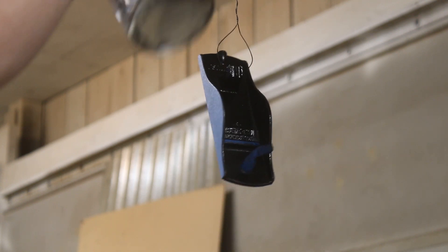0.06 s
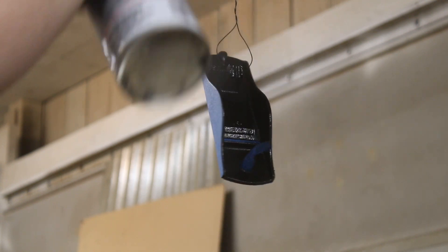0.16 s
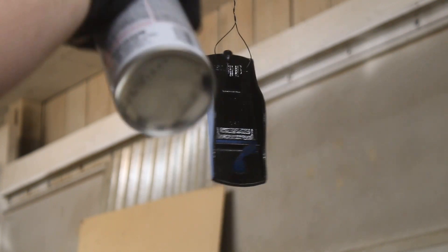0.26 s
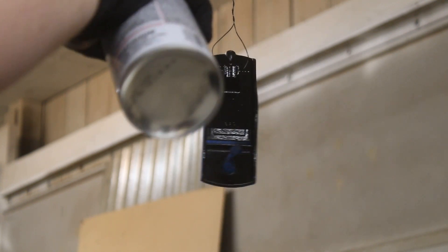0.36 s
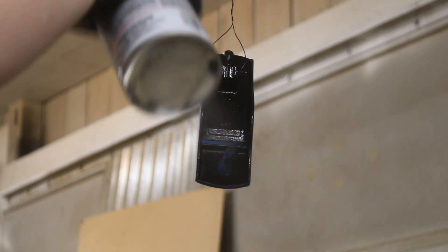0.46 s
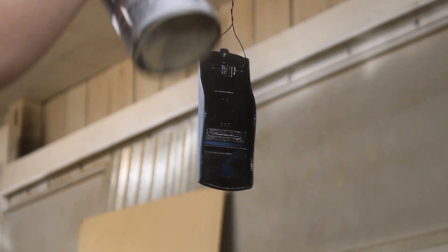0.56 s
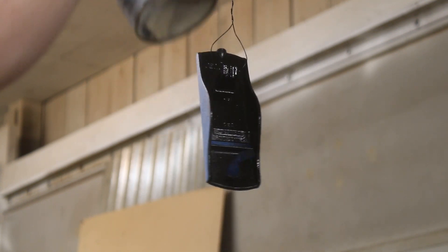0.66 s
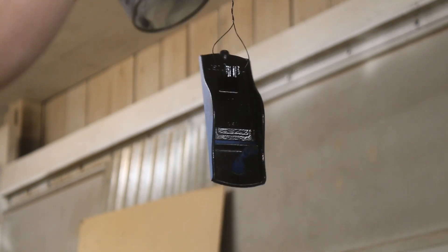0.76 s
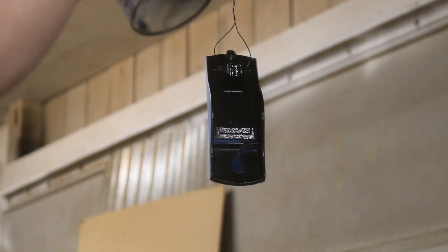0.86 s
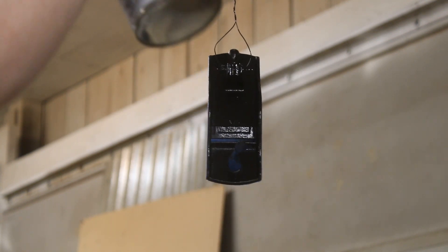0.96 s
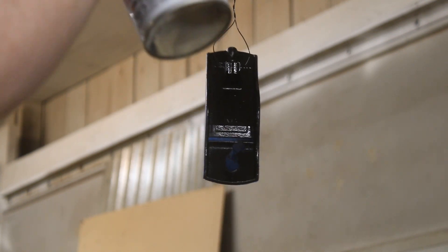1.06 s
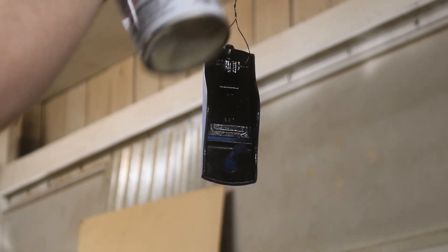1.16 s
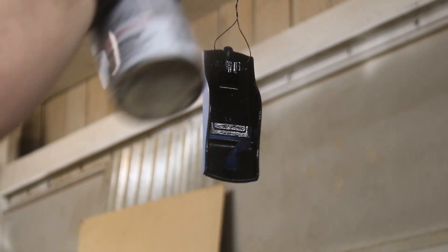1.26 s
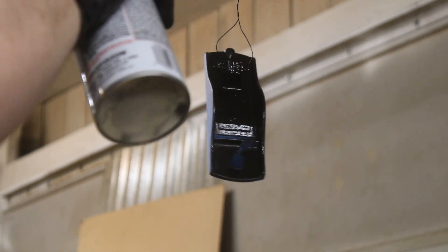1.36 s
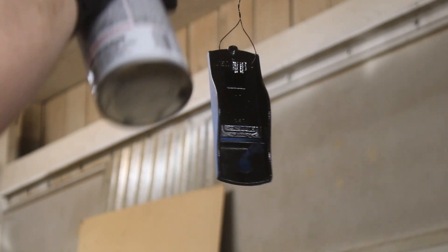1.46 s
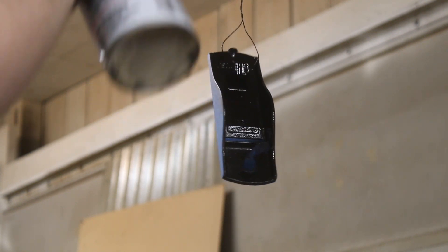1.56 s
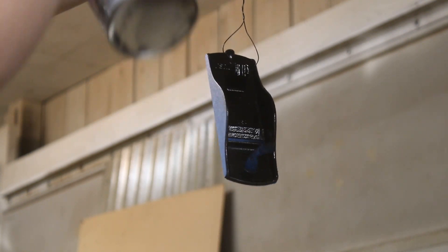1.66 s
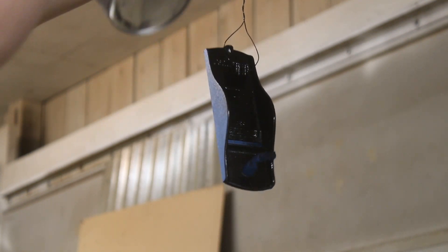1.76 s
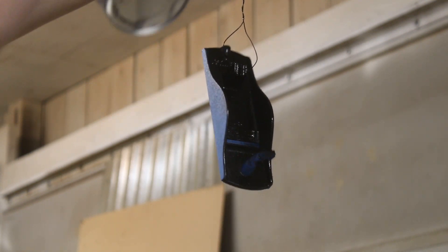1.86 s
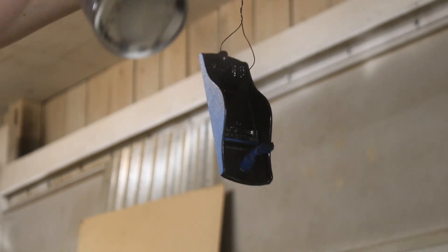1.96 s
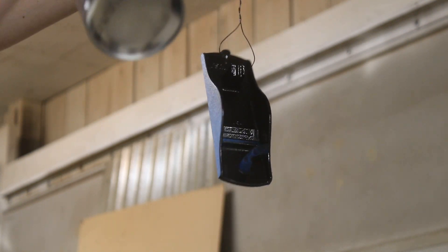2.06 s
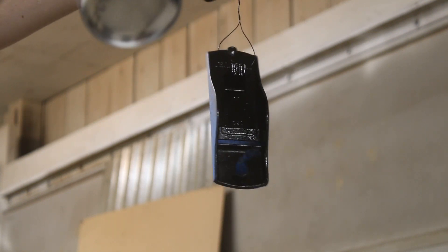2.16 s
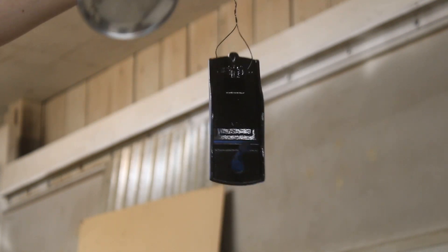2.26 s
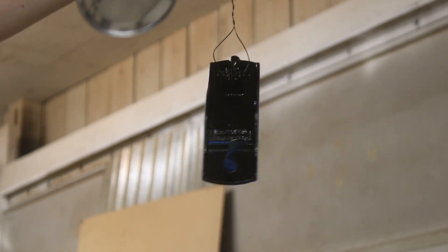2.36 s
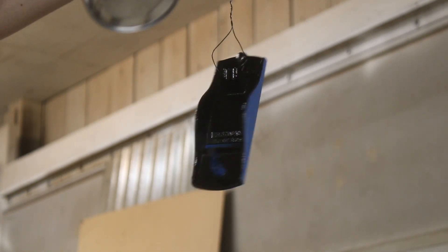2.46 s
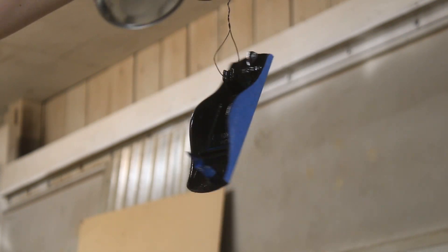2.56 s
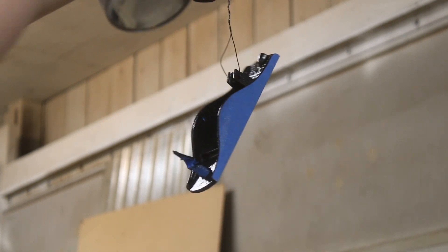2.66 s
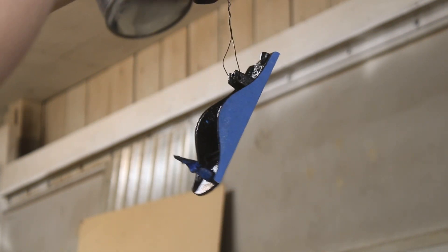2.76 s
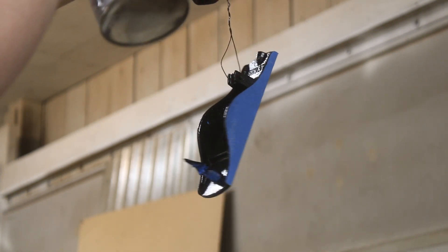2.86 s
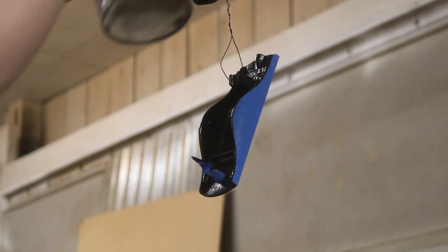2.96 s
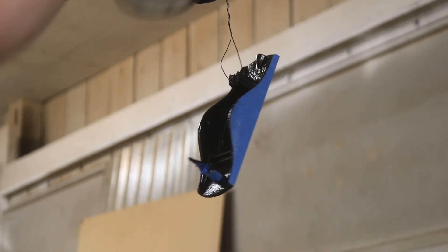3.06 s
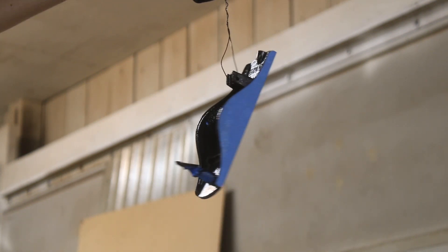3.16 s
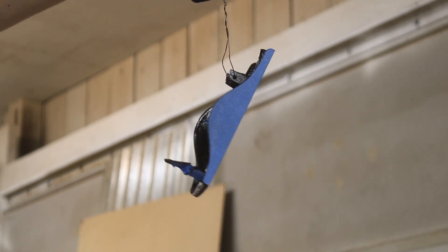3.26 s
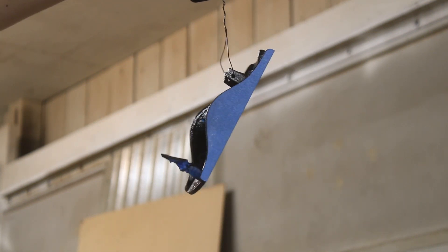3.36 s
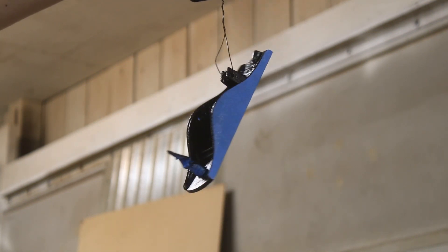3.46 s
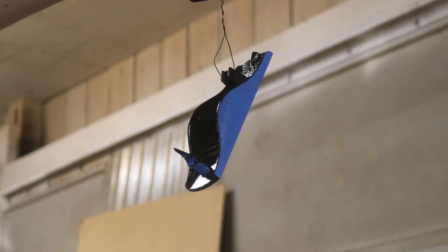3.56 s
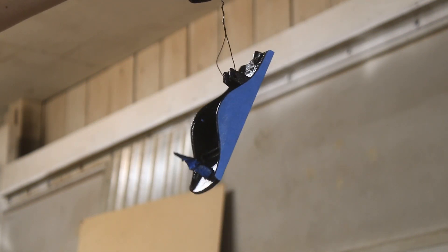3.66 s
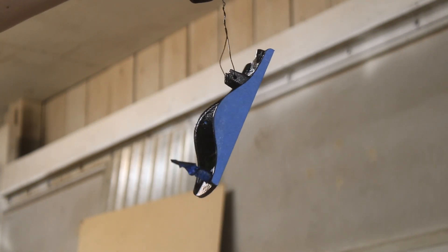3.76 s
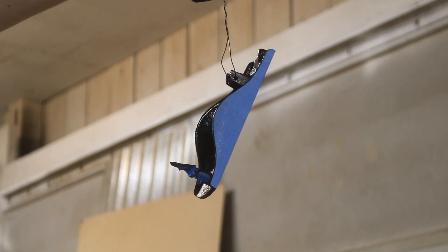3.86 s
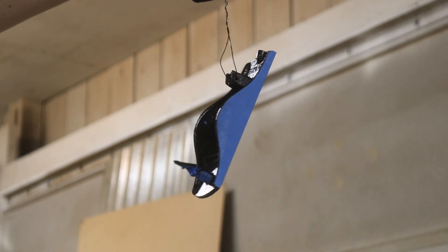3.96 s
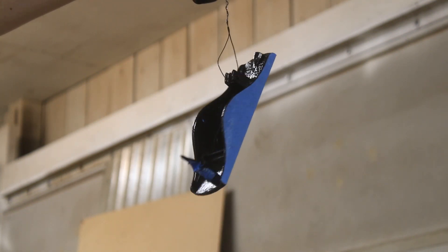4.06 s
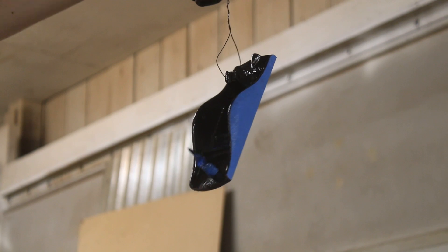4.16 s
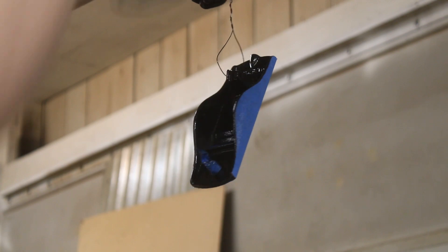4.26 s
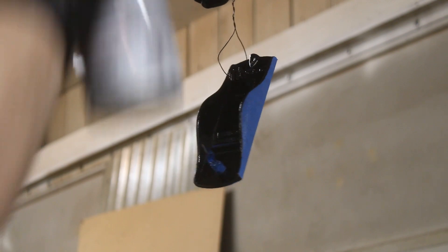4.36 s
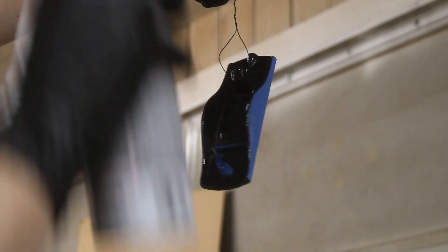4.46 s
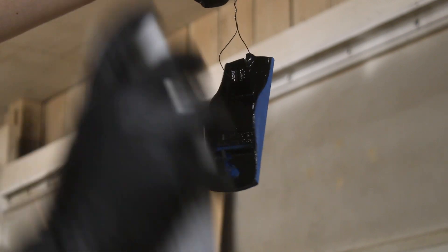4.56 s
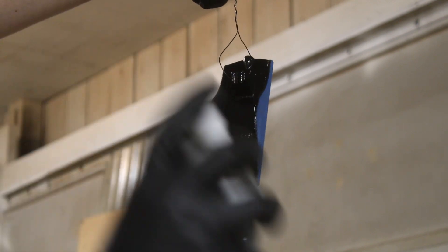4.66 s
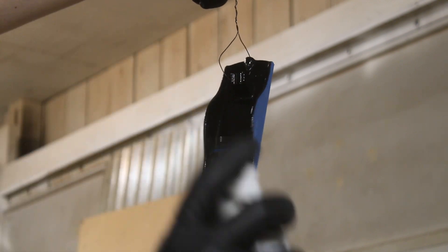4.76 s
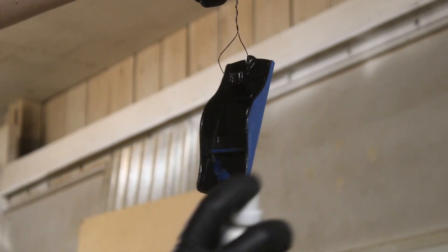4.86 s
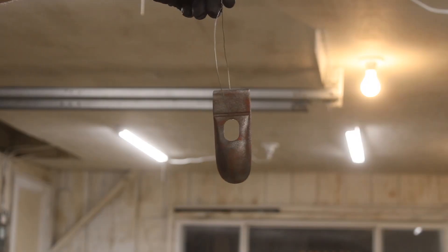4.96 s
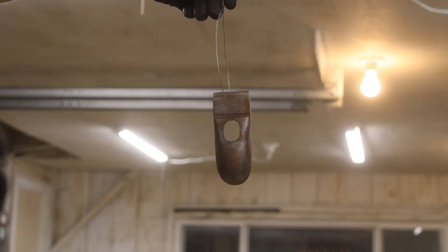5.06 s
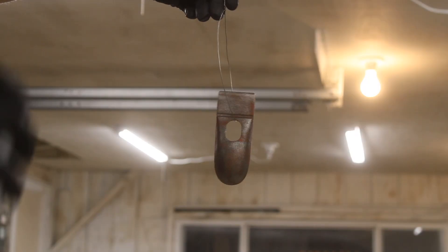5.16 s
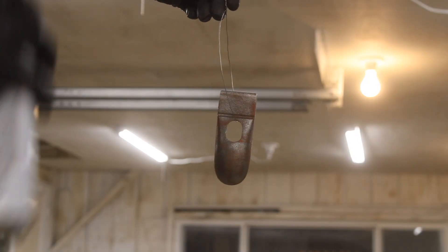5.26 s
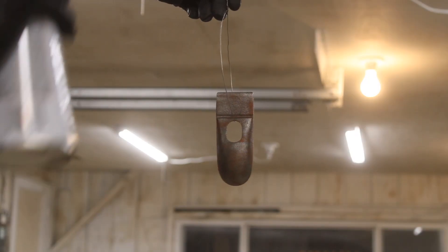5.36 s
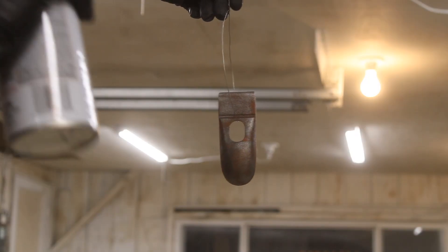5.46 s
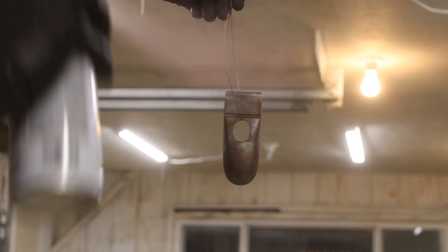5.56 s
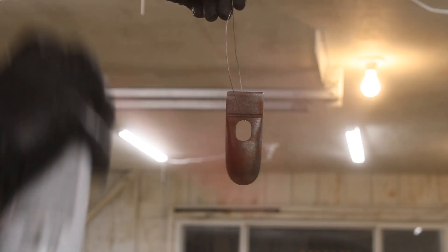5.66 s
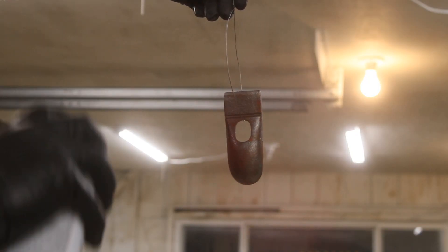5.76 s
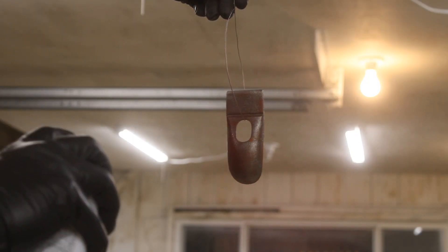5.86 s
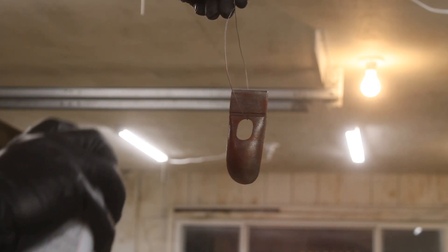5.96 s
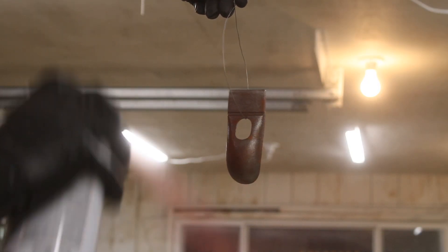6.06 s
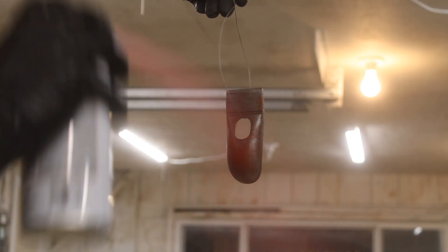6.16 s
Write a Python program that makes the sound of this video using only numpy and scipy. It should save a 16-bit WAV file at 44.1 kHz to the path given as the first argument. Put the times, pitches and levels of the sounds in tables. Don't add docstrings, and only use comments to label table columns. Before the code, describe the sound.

In a wooden workshop, a close spray can gives short bright hisses, each opening with a plastic click and a surge before cutting off into a diffuse room tail. Between them the mixing ball tinks faintly and gloves and sleeve rustle. After a fifth burst comes soft handling, then a change of corner with mains hum and two bursts from a second can. A far machine drones low.

```python
import sys
import numpy as np
from scipy import signal
from scipy.fft import rfft, irfft, next_fast_len
from scipy.io import wavfile

SR = 44100
rng = np.random.default_rng(int(sys.argv[2]) if len(sys.argv) > 2 else 0)


def to_wav(sig):
    pcm = np.clip(np.atleast_2d(sig), -1, 1) * 32767
    pcm = np.round(pcm).astype(np.int16)
    wavfile.write(sys.argv[1], SR, pcm.T)


def makeup_ratio(level_db):
    decades = np.asarray(level_db, float) / 20
    return 10 ** decades


N = 274302
CHANGE_S = 5
BURST = int(0.4 * SR)

# time_s, level_db
MACHINE_SWELL = [(0, -2.5), (1.2, 1.5), (2.4, 1.5), (3.2, -2.5), (4.9, -11), (6.22, -10)]


def rms_one(x):
    return x / np.sqrt(np.mean(x ** 2) + 1e-20)


def at_hz(points, hz):
    points_hz, values = np.transpose(points)
    return np.interp(np.log(hz), np.log(points_hz), values)


def in_time(rows):
    s, *columns = np.transpose(rows)
    return np.array([np.interp(np.arange(N) / SR, s, c) for c in columns])


def drift(rate_hz):
    r = np.exp(-2 * np.pi * rate_hz / SR)
    wander = signal.lfilter([1], [1, -2 * r, r * r], rng.standard_normal(N + SR))
    return rms_one(wander[SR:])


def coloured(spectrum):
    size = next_fast_len(N)
    hz = np.maximum(np.arange(size // 2 + 1) * SR / size, 10)
    shape = makeup_ratio(at_hz(spectrum, hz)) * (hz > 18)
    return rms_one(irfft(rfft(rng.standard_normal(size)) * shape, size)[:N])


def band(x, low_hz, high_hz):
    sos = signal.butter(2, [low_hz, min(high_hz, 0.45 * SR)], "band", fs=SR, output="sos")
    return signal.sosfilt(sos, x)


def resonate(x, hz, width_hz):
    r = np.exp(-np.pi * width_hz / SR)
    poles = [1, -2 * r * np.cos(2 * np.pi * hz / SR), r * r]
    return signal.lfilter([(1 - r * r) / 2, 0, (r * r - 1) / 2], poles, x)


def strike(out, s, burst):
    i = round(s * SR)
    return out + np.pad(burst[:N - i], (i, max(N - i - len(burst), 0)))


def dying(t60_s, count=BURST):
    return makeup_ratio(-60 * np.arange(count) / (SR * t60_s))


def flow(press, surge):
    # core_db, middle_db, can_body_db, top_edge_db
    band_levels = [
        (0, -6.5, -9.5, -15.5),
        (0, -5, -6.5, -14.5),
    ]
    aim_lift, leak_lift, sigh_lift = (-3, 8.5, 6, 6), (-4, 2.5, 10, -5), (-1, 1, 3.5, 1)
    crack_db, open_s, open_db, shut_s = -20.5, 0.011, -3.5, 0.024
    leak_s, sigh_s = 0.01, 0.0071

    start_s, held_s, flow_db, aim = press
    peak_s, surge_db, settle_s = surge
    t = np.arange(N) / SR - start_s
    top_db = flow_db + surge_db
    jet_db = np.interp(t, [0, min(open_s, 0.9 * peak_s), peak_s, peak_s + settle_s],
                       [top_db + crack_db, top_db + open_db, top_db, flow_db])
    leak = np.exp(-np.abs(t) / leak_s)
    sigh = np.exp(-np.maximum(held_s - t, 0) / sigh_s)
    opened = np.clip(t / 0.00071, 0, 1) * np.clip((held_s + shut_s - t) / shut_s, 0, 1)
    levels = band_levels[int(start_s > CHANGE_S)]
    lift_db = [b + aim * a + leak * k + sigh * g
               for b, a, k, g in zip(levels, aim_lift, leak_lift, sigh_lift)]
    return opened * makeup_ratio(jet_db + np.array(lift_db))


def spray():
    # start_s, held_s, steady_flow_db, aim (-1 toward the ear to 1 away)
    presses = [
        (0.069, 0.17, -40.5, 0.027),
        (0.416, .2, -40, -0.11),
        (1.208, 0.12, -41, -0.048),
        (1.902, 0.11, -42.5, 0.073),
        (3.45, .13, -43, 0.019),
        (5.521, .2, -43, 0.22),
        (6.052, .3, -40.5, 0.045),
    ]
    # peak_after_s, over_steady_flow_db, settle_s
    surges = [
        (0.019, 8.5, 0.025),
        (0.013, 7.5, 0.036),
        (0.028, 8, 0.029),
        (0.032, 9, 0.051),
        (.012, 8, .11),
        (0.093, 10, 0.096),
        (0.03, 6.5, 0.03),
    ]
    # freq_hz, density_db
    first_jet, second_jet = [(240, -31), (400, -11), (653, -16), (900, -10), (1120, -15), (2290, -2.5),
                             (3110, -4.5), (7100, 2), (13100, -20), (15500, -40)], [(240, -31), (400, -14), (1030, -20.5), (1400, -10.5),
                                          (2120, -9.5), (2320, -3), (2560, -3), (2800, -2.5), (3010, -10),
                                          (5300, -3.5), (7670, 2.5), (11400, -14), (14000, -25),
                                          (15500, -43)]
    # freq_hz, width_hz, level_db
    whistles = [(2240, 74, -32), (5620, 100, -20), (6800, 510, -9), (7350, 180, -10), (7830, 600, -11)]

    t = np.arange(N) / SR
    gains = sum(flow(press, surge) for press, surge in zip(presses, surges))
    white = rng.standard_normal(N)
    whistle = sum(makeup_ratio(db) * rms_one(resonate(white, hz, width)) * makeup_ratio(2.0 * drift(13))
                  for hz, width, db in whistles)
    noise = np.where(t < CHANGE_S, coloured(first_jet), coloured(second_jet)) + whistle
    other = np.where(t < CHANGE_S, coloured(first_jet), coloured(second_jet)) + whistle[::-1]
    core, middle = band(noise, 5770, 10950), band(other, 3400, 6360)
    can_body, top_edge = band(noise, 310, 3490), band(other, 10200, 15800)
    jet = sum(gain * rms_one(part) * makeup_ratio(1.2 * drift(40))
              for gain, part in zip(gains, [core, middle, can_body, top_edge]))
    sputter = makeup_ratio(0.4 * drift(280) + 0.28 * drift(30))
    return jet * sputter


def valve():
    # time_s, peak_db, pitch_hz, t60_s, crack_db
    clicks = [
        (0.0726, -37, 2320, 0.06, -3),
        (0.4183, -40, 2740, 0.072, -9),
        (1.2123, -25.5, 2706, 0.047, -20),
        (1.2274, -32, 2290, 0.081, -8),
        (1.9134, -34, 2330, 0.12, -4),
        (3.451, -27, 2720, 0.075, -16),
        (5.5141, -27, 2880, 0.033, -2),
        (5.7172, -30.5, 2860, 0.052, 9),
        (6.0567, -28, 2675, 0.093, -21),
    ]
    out, t = np.zeros(N), np.arange(BURST) / SR
    for s, db, hz, t60, crack_db in clicks:
        crack = band(rng.standard_normal(BURST) * dying(0.0091), 1200, 7400)
        ping = np.sin(2 * np.pi * hz * t)
        ping = ping + 0.26 * np.sin(2 * np.pi * 1.17 * hz * t) + 0.08 * np.sin(2 * np.pi * 0.5 * hz * t)
        ping = ping * dying(min(t60, 0.06)) * (1 - dying(0.003))
        out = strike(out, s, makeup_ratio(db - 6.5) * (ping + makeup_ratio(crack_db) * crack))
    return out


def ball():
    # time_s, peak_db, brightness_db
    touches = [(0.0044, -76, -4), (0.3726, -51.5, 4), (0.9198, -62, 2), (0.966, -57.5, 7),
               (2.6748, -54.5, 2), (2.7094, -65, 0), (3.2535, -56, 9), (3.3064, -63, -2), (3.3494, -69, 0),
               (3.8492, -56.5, 9), (3.898, -65, 1), (3.9789, -73, 0)]
    # freq_hz, level_db, t60_s
    wall = [(3350, -7, .1), (3460, -5, .1), (3570, -2, .2), (3640, -3, .26), (5020, -14, .08),
            (5500, -10, .1), (6120, -15, .07), (6480, -10, .1), (7150, -15, .07), (8750, -14, .11)]
    out, t = np.zeros(N), np.arange(BURST) / SR
    spread = rng.normal(0, 1.9, (len(touches), len(wall)))
    for (s, db, bright_db), own in zip(touches, spread):
        ring = sum(makeup_ratio(level + d + bright_db * (hz > 4000)) * np.sin(2 * np.pi * hz * t + d) * dying(t60)
                   for (hz, level, t60), d in zip(wall, own))
        slosh = rms_one(band(rng.standard_normal(BURST), 3200, 7500)) * dying(0.17)
        out = strike(out, s, makeup_ratio(db - 2.0) * (ring + makeup_ratio(-5) * slosh) * (1 - dying(0.0047)))
    return out


def ticks():
    # time_s, peak_db, centre_hz, width_octaves, t60_s
    touches = [(.48, -52, 385, 0.74, 0.72), (2.2, -52.5, 2500, 1.3, 0.19), (2.205, -56.5, 1357, 0.2, 0.36),
               (2.581, -55.5, 6500, 1.1, .03), (4.093, -57, 6800, 0.65, 0.059),
               (4.168, -42, 2190, 1.5, 0.019), (4.168, -38, 4340, 0.53, 0.022),
               (4.167, -42, 7050, 0.51, 0.022), (4.195, -59, 4100, .5, .12),
               (4.521, -44.5, 9100, 0.88, 0.0072), (4.57, -52, 4000, 2.2, .015),
               (4.654, -51, 4400, .4, 0.04), (4.654, -53.5, 7750, 0.36, 0.06),
               (4.656, -52, 1500, 0.3, 0.068), (4.569, -51, 1450, 0.34, .03),
               (4.679, -57, 3020, 0.17, 0.056), (4.679, -50, 1710, .8, .03),
               (5.514, -42.5, 1460, .4, 0.023), (5.503, -61, 7000, .8, 0.028), (4.67, -59, 4380, .15, .2),
               (4.7, -54, 6440, 0.16, 0.058), (4.72, -60, 7850, 0.14, 0.27),
               (4.785, -59, 3030, 0.16, 0.084), (4.812, -45.5, 3300, 1.5, 0.027)]
    out, white = np.zeros(N), rng.standard_normal((len(touches), BURST))
    for (s, db, hz, octaves, t60), w in zip(touches, white):
        edges = hz * 2 ** (-octaves / 2), hz * 2 ** (octaves / 2)
        grain = rms_one(band(band(w, *edges), *edges))[::-1]
        out = strike(out, s, makeup_ratio(db - 1.0) * grain * dying(t60) * (1 - dying(0.14 * t60)))
    return out


def rustle():
    # start_s, loudest_s, end_s, level_db
    rubs = [
        (1.746, 1.897, 1.93, -66),
        (3.098, 3.293, 4.8, -66.5),
        (4.285, 4.695, 4.98, -60),
        (5.2, 5.45, 4.9, -78),
    ]
    edge_db = -17
    t = np.arange(N) / SR
    gain = 0
    for start, top, end, db in rubs:
        swell_db = np.interp(t, [start, top, end], [db + edge_db, db, db + edge_db])
        gain = gain + makeup_ratio(swell_db) * (t > start) * (t < end)
    grains = rng.standard_normal(N) * makeup_ratio(2.0 * drift(300))
    cloth = band(grains, 2500, 6800) + 0.46 * resonate(grains, 4500, 400) + 0.5 * resonate(grains, 7100, 300)
    return gain * rms_one(cloth)


def room(x):
    # freq_hz, t60_s
    ring_times = [(500, 1), (2000, 0.8), (5000, 0.72), (8000, 0.57), (12000, 0.51), (15500, 0.34)]
    edges, count = 350 * 2 ** np.arange(0, 5.7, 1 / 3), int(0.9 * SR)
    white = rng.standard_normal((len(edges), count))
    tail = sum(band(w, low, high) * dying(at_hz(ring_times, np.sqrt(low * high)), count=count)
               for w, low, high in zip(white, edges, edges[1:]))
    tail = tail * (1 - dying(0.0093, count=count))
    return signal.fftconvolve(x, tail / np.sqrt(np.sum(tail ** 2)))[:N]


def drone():
    # freq_hz, level_db, waver_hz
    hums = [(91.7, -62, 12.5), (206.8, -64.5, 7.8), (252.8, -65.5, 0.58), (452, -75, 0.5),
            (488.6, -73.5, 0.85), (653, -78, 0.65)]
    t = np.arange(N) / SR
    lines = [makeup_ratio(db + 0.96 * drift(waver)) * np.sin(2 * np.pi * hz * t + 0.85 * drift(waver))
             for hz, db, waver in hums]
    return np.sqrt(2) * sum(lines) * makeup_ratio(in_time(MACHINE_SWELL)[0])


def shop():
    # freq_hz, density_db
    air = [(15, -55), (25, -30), (59, -2), (152, -0.5), (198, -4), (368, -11), (410, -13), (445, -14.5),
           (598, -16), (684, -17), (1450, -21.5), (2700, -24), (7910, -30.5), (14300, -47.5), (15500, -64)]
    air_db, rumble_db, sub_db, hum_db = -54.5, -56, -70, -60
    hum_hz, hum_on_s, hum_rise_s = 59.6, 4.89, 0.06
    t = np.arange(N) / SR
    tone = coloured(air)
    low, sub = band(tone, 59, 670), band(tone, 22, 50)
    lumpy_db = rumble_db + 0.1 * in_time(MACHINE_SWELL)[0] + 1.1 * drift(1.8)
    tone = makeup_ratio(air_db) * (tone - low) + makeup_ratio(lumpy_db) * rms_one(low) + makeup_ratio(sub_db) * rms_one(sub)
    hum = np.sqrt(2) * np.sin(2 * np.pi * hum_hz * t) * makeup_ratio(0.5 * drift(3.3))
    return tone + hum * makeup_ratio(hum_db) * np.clip((t - hum_on_s) / hum_rise_s, 0, 1)


def scene():
    room_db, contact_room_db = -5.5, -7
    can = spray()
    hands = ball() + valve() + ticks() + rustle()
    tail = makeup_ratio(room_db) * room(can + makeup_ratio(contact_room_db) * hands)
    return (can + hands + tail + shop() + drone())[None]


def roll_off(x):
    return signal.sosfilt(signal.butter(12, 15680, fs=SR, output="sos"), x)


def record(dry):
    low_pass = signal.cheby1(10, 0.5, 15200, fs=SR, output="sos")
    return roll_off(signal.sosfilt(low_pass, dry))


dry = scene()
out = record(dry)
to_wav(out)
```